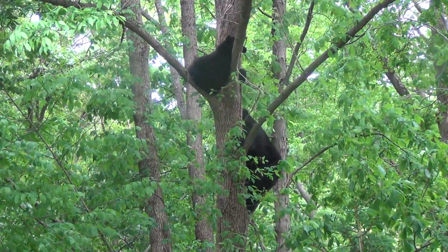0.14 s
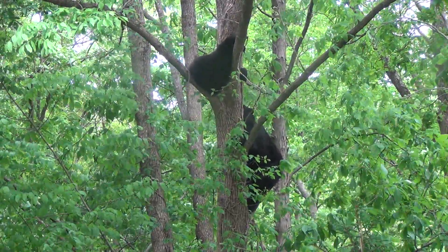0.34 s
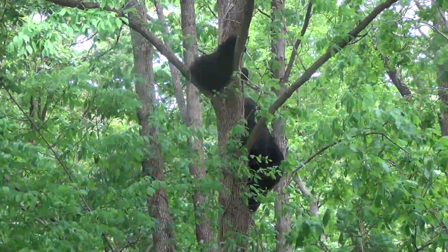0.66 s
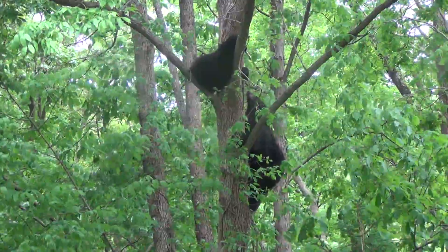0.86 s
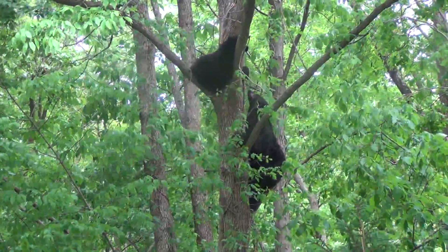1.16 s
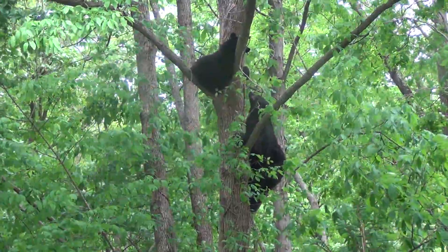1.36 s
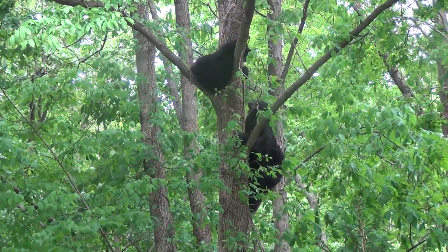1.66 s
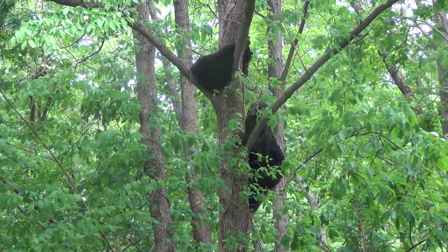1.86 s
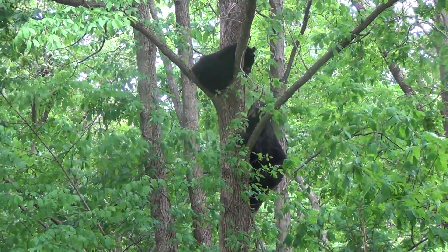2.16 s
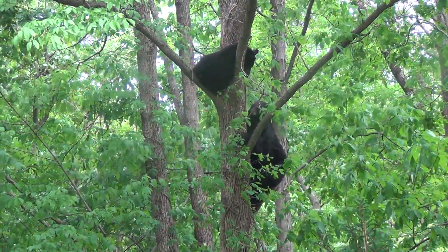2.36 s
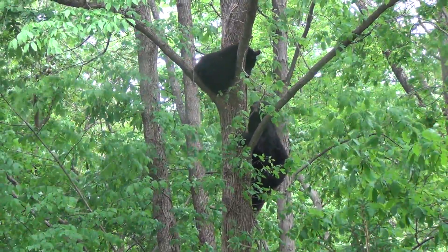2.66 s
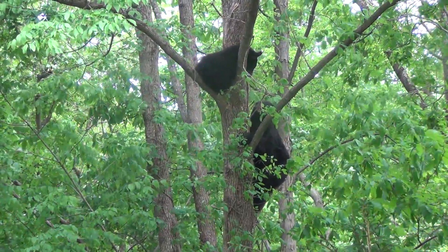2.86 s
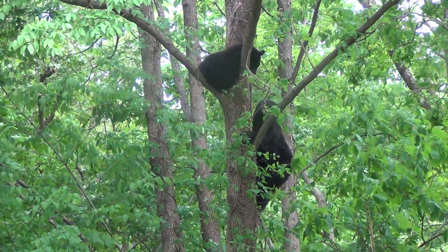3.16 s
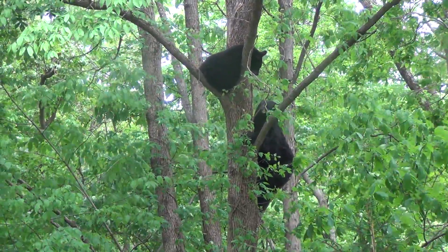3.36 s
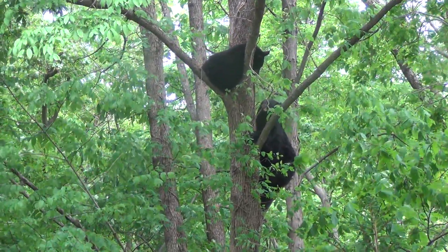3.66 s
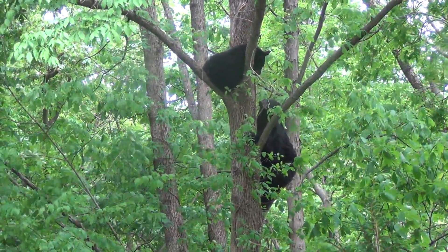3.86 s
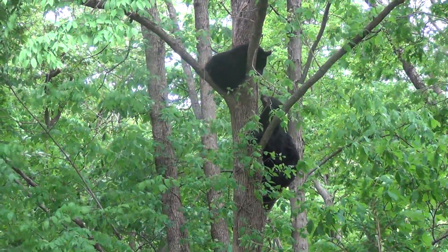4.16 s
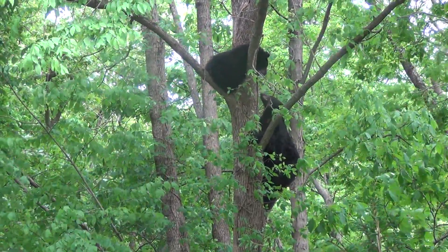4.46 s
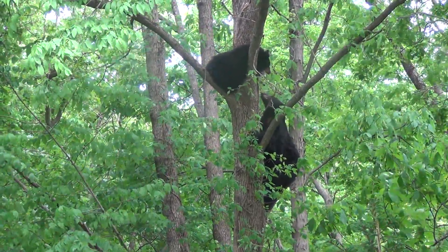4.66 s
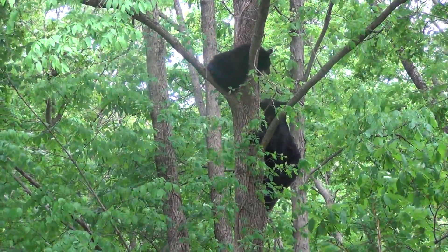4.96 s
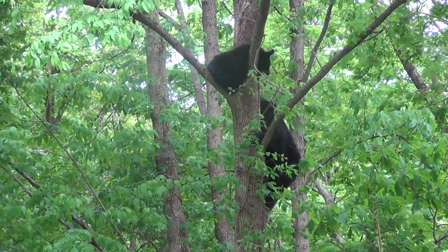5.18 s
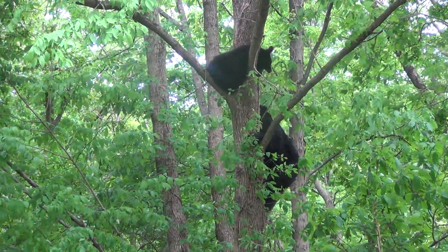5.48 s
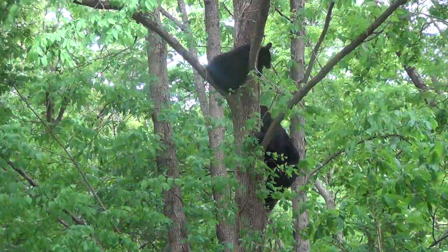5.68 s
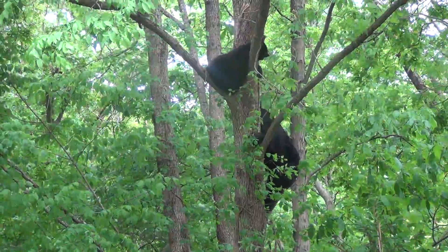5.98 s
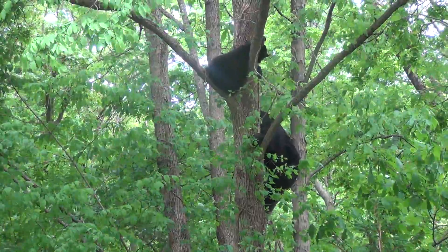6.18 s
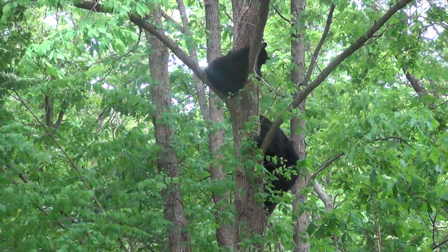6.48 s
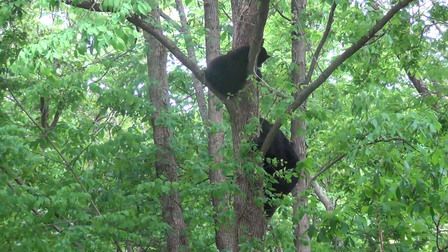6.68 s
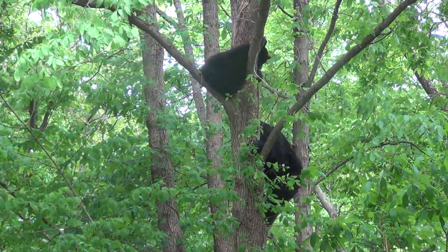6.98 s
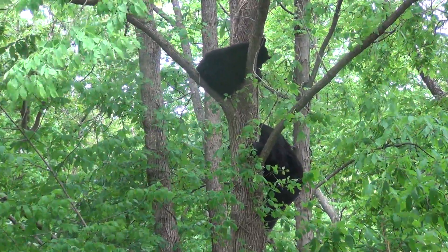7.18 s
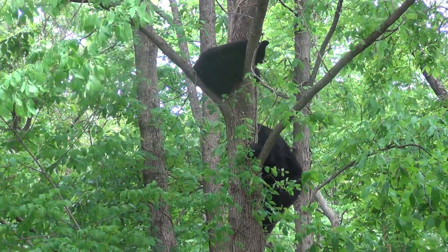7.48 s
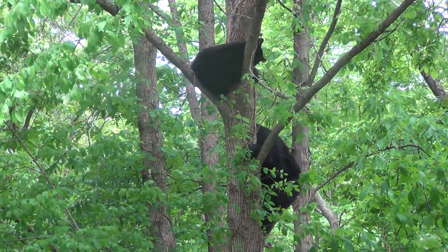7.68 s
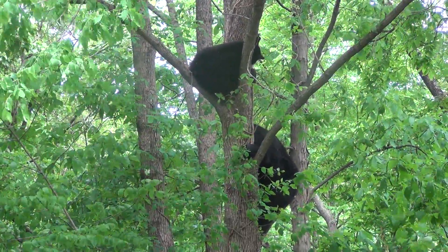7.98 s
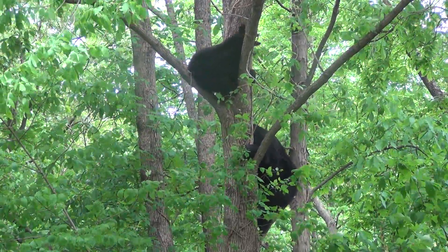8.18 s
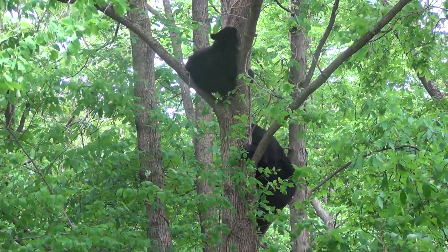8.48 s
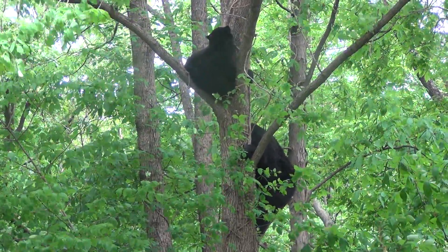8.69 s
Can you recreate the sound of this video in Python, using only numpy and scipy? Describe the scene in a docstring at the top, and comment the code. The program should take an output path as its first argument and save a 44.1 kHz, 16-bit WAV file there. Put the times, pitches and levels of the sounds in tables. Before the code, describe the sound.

A large dog barks repeatedly in echoing woods while treed bears scrape bark, pop jaws and huff, then one bawls into a hoarse, throbbing bellow.

```python
"""Dog and treed bears

A large dog barks up at two black bears in a tree: harsh pulses and breath through throat resonances, plus
a ringing octave and a second tone; the woods ring after each bark. The bears scrape the trunk (filtered
grain), pop their jaws and huff (noise bursts). A squeak sounds once; then one bear bawls and breaks into a
hoarse, pulsing bellow (vocal-fold pulses and breath). A gain control ducks under loud sounds."""
import sys
import numpy as np
from scipy import signal
from scipy.fft import rfft, irfft
from scipy.io import wavfile
from scipy.ndimage import uniform_filter1d, minimum_filter1d

SR = 44100
rng = np.random.default_rng(int(sys.argv[2]) if len(sys.argv) > 2 else 0)


def dump(signal):
    """Clip the signal to [-1, 1] and save it as 16-bit WAV at the path in sys.argv[1]."""
    limited = np.clip(np.atleast_2d(signal).T, -1, 1)
    pcm = np.round(limited * 32767).astype(np.int16)
    wavfile.write(sys.argv[1], SR, pcm)


N = 389844

# All level columns are relative, ahead of the mix.
# wash of the woods: [freq_hz, spectrum_db]
WASH_COLOUR = [(15, -37.5), (25, -17.5), (53, -7), (86, -4), (133, -2), (179, -6.5), (437, 3.5),
               (1120, -9.5), (1390, -7.5), (1590, -13), (2730, -16), (3130, -18), (3390, -16.5),
               (6140, -19), (15800, -26.5)]
WASH_DB = -50.5
# reverberation of the woods: [freq_hz, t60_s]
WOODS_DECAY = [(200, 0.62), (600, 0.61), (1200, 0.72), (3000, 0.52), (8000, 0.38)]

# claw strokes on the trunk: [start_s, level_db, rise_s, hold_s, fade_db_per_s, treble_db]
SCRAPES = [(0, -60.5, 0.015, 0.083, 79, 5), (0.404, -58.5, 0.014, .05, 42.5, 1),
           (0.53, -55.5, .02, .01, 81.5, 4), (1.049, -55.5, .035, .04, 40.5, 0.5),
           (1.134, -50.5, 0.063, 0.19, 126.5, -3), (1.5, -50.5, 0.034, .01, 54.5, -3.5),
           (4.091, -58, 0.04, 0.027, 63.5, -2), (5.53, -46, 0.025, 0.031, 66, 1),
           (5.996, -47, 0.042, 0.022, 105.5, -9.5), (6.205, -43.5, 0.03, 0.14, 41, 1),
           (6.36, -41.5, 0.025, 0.0088, 102, -0.5), (6.498, -48, .04, 0.19, 83, -3),
           (6.69, -50, 0.037, 0.14, 182.5, 5), (7.878, -50.5, 0.034, 0.046, 15, -2.5),
           (8.298, -53.5, 0.13, 0.076, 67.5, 2.5)]
# spectrum of the scrapes: [freq_hz, spectrum_db]
SCRAPE_COLOUR = [(60, -0.5), (150, 7.5), (400, 15), (1200, 6), (2000, 5.5), (3000, -2), (5000, -4),
                 (8200, -5.5), (10000, -22), (14000, -35.5)]
# dull bumps of a shifting body: [start_s, level_db, length_s]
BUMPS = [(1.112, -45, 0.28), (1.274, -36, 0.1525), (5.533, -66, 0.24)]

# barks: [start_s, effort_db, base_pitch_hz, roughness_0_to_1, second_tone_db]
BARKS = [(0.035, -18.5, 320.4, 0.51, -19.5), (0.392, -19.5, 298, 0.56, -3), (0.968, -19, 319.6, 0.45, -9.5),
         (1.315, -21, 283.7, 1, -5), (1.939, -19.5, 316.5, 0.51, -16.5),
         (2.794, -18.5, 313.7, 0.434, -12.5), (3.198, -19, 292.5, 0.55, -3),
         (3.874, -19, 318.8, 0.51, -9.5), (4.71, -18, 314, 0.47, -9.5), (5.173, -20, 302.2, 0.44, -6),
         (5.69, -17, 302.3, 0.46, -7.5), (7.843, -17.5, 322.4, 0.56, -2.5)]
# dog's throat resonances: [freq_hz, width_hz, level_db]
DOG_THROAT = [(284, 43, -12.5), (461, 189, 1), (605, 162, 0.5), (754, 56, -2), (1001, 118, -9.5),
              (1120, 350, -19.5), (1396, 270, -30.5), (1856, 284, -24.5), (4230, 500, -34),
              (5900, 590, -42.5), (7900, 2100, -46)]
# bark level: swell over the attack, hold, then a fade that steepens
BARK_ATTACK_S, BARK_SWELL_DB, BARK_HOLD_S, BARK_RELEASE_S, BARK_FADE_DB = 0.059, 20.5, 0.031, 0.15, 26
# bark pitch: starts high by a share, settles, sags by a share per s
BARK_YELP, BARK_SETTLE_S, BARK_SAG_PER_S = 0.08, 0.055, 0.37
# ringing peak of a bark: octave level ahead of the roughness scaling, time after the start, half length
RING_DB, RING_S, RING_HALF_S = 15, 0.094, 0.033

# hollow jaw pops: [start_s, level_db, pitch_hz]
POPS = [(1.272, -41.5, 1656), (1.325, -37, 1124), (1.834, -39.5, 1277), (4.731, -47, 1880),
        (5.673, -29, 1316)]
# sharp huffs: [start_s, level_db, t60_s, mouth_resonance_hz]
HUFFS = [(1.832, -41.5, 1, 1367), (1.873, -42, 0.9, 1515), (4.73, -35, 0.66, 1710),
         (5.512, -36.5, 1.25, 2180), (5.69, -49, 3, 2076), (6.04, -46, 2, 2080)]
# spectrum of the huffs' hiss: [freq_hz, spectrum_db]
HUFF_COLOUR = [(120, -33.5), (200, -18), (445, -3), (532, -10), (591, 7.5), (658, -22), (875, -24),
               (990, 3), (1540, -11), (2130, -4), (2540, -14.5), (2930, -6.5), (4250, -12.5), (8210, -15.5),
               (14000, -52)]
# squeak: top of the arch, half length, pitch range, level, flutter
SQUEAK_S, SQUEAK_HALF_S, SQUEAK_LOW_HZ, SQUEAK_TOP_HZ = 2.14, 0.07, 700, 1345
SQUEAK_DB, SQUEAK_FLUTTER_DB = -54.5, 5

# bear's calls, a short open bawl, then two that close to a hoarse bellow: [start_s, length_s, release_s,
# effort_db, bawl_pitch_hz, start_bend_hz, jaw_db, mouth_db, mouth_tuning_factor, opening_s, closes_after_s]
BEAR_CALLS = [(6.193, 0.4, 0.16, -11.5, 367.1, -30, 0.5, -2.5, 0.994, 0.068, 0.48),
              (6.646, 1.3, .14, -16.5, 361.5, -30, 1.5, -1.5, .96, 0.024, .26),
              (8.287, 0.64, .1, -15.5, 323.6, 45, 4, -11, .88, 0.012, .12)]
# bear's resonances with the jaw shut: [freq_hz, width_hz, level_db]
BEAR_CHEST = [(339.7, 168, 1), (510, 135, -5), (1737, 140, -34.5), (3130, 330, -51), (4800, 520, -38),
              (5860, 410, -39.5), (8400, 1400, -54.5)]
# bear's resonances with the jaw dropped: [freq_hz, width_hz, level_db]
BEAR_THROAT = [(600.7, 102, 3.5), (708, 78, -3.5), (862, 101, -11)]
# bear's resonances with the mouth wide open, ahead of tuning: [freq_hz, width_hz, level_db]
BEAR_MOUTH = [(992, 185, -5.5), (1112, 66, -1), (1250, 63, 2), (1446, 86, -11), (2123, 234, -11.5)]
# mouth closed to a bellow
BELLOW_HZ, BELLOW_JAW_DB, BELLOW_MOUTH_DB = 310.8, -5, -31.5
# roughness 0-1 of the first instant, the bawl, the bellow and the top of a strong throb
ROUGH_ONSET, ROUGH_BAWL, ROUGH_BELLOW, ROUGH_THROB = 0.8, 0.34, 0.68, 0.22
# throbs of effort: [top_s, surge_db, half_length_s, jaw_drop_before_db, recorder_thump_db]
THROBS = [(6.258, -1.5, 0.027, -2.5, -41), (6.402, -8.5, .03, -1, -47), (6.724, 3.5, .02, 1.5, -42.5),
          (6.778, 2, .025, -1.5, -56), (7.0, 7, .025, 4.5, -39), (7.24, 6, .024, 6.5, -38.5),
          (7.462, 8, .018, 3, -38), (7.515, 5.5, .018, -0.5, -37.5), (7.735, 10, .018, 8.5, -33.5),
          (8.381, 3.5, .025, -2, -36.5), (8.481, 3, .03, 6.5, -56), (8.619, 5.5, .035, -2.5, -36.5),
          (8.69, 4, .035, 7.5, -65)]
# a throb shifts the bellow's pitch and closes the jaw, which gapes just before
THROB_HZ, THROB_JAW_DB, GAPE_LEAD_S, GAPE_HALF_S = 349.3, -6.5, 0.039, 0.024
# calls: end ramps, release fade, tiring, mouth closing, pitch bend
CALL_RAMP_S, CALL_FADE_DB, CALL_TIRE_DB_PER_S, CLOSING_S, BEND_S = 0.035, 26, 1.6, 0.05, 0.075

EDGE_HZ = 15900  # upper band limit


def amp(db):
    """Decibels to gain."""
    return 10 ** (np.asarray(db) / 20)


def evened(x):
    """Scales to rms 1."""
    return x / np.sqrt(np.mean(x ** 2) + 1e-20)


def bell(t, half_s):
    """Smooth hump of height 1 around t = 0."""
    return np.exp(-(t / half_s) ** 2)


def blend(a, b, share):
    """Goes from a to b as share goes from 0 to 1."""
    return a + (b - a) * share


def read(points, hz):
    """Joins (Hz, value) points on a log-frequency axis."""
    f, value = np.transpose(points)
    return np.interp(np.log(hz + 1), np.log(f + 1), value)


def add(mix, s, sound):
    """Mixes a sound in at time s."""
    part = mix[max(round(s * SR), 0):][:len(sound)]
    part += sound[:len(part)]


def coloured(x, curve):
    """Filters N samples by a (Hz, dB) curve, zero phase."""
    gain = amp(read(curve, np.fft.rfftfreq(N, 1 / SR)))
    return irfft(rfft(x) * gain, N)


def noise(colour):
    """Noise of a given spectrum, rms 1."""
    return evened(coloured(rng.standard_normal(N), colour))


def wander(size, hz):
    """Smooth random curve with about hz new values a second."""
    return np.interp(np.arange(size) * hz / SR, np.arange(4000), rng.standard_normal(4000))


def throat(x, modes, low_hz):
    """Causal minimum-phase filter: steep resonances, little below low_hz, output rms 1."""
    f = np.fft.rfftfreq(8192, 1 / SR)
    power = sum(amp(db) ** 2 / (1 + ((f - hz) / width) ** 2 * 2) ** 3 for hz, width, db in modes)
    gain = np.sqrt(power / (1 + (low_hz / (f + 1)) ** 8)) + 1e-5
    log_gain = np.log(np.r_[gain, gain[-2:0:-1]])
    taps = np.fft.ifft(np.exp(np.conj(signal.hilbert(log_gain)))).real[:2048]
    return evened(signal.fftconvolve(x, taps)[:len(x)])


def folds(hz, rough, jitter, jitter_hz, top_hz, limp=0):
    """Jittered vocal-fold pulses, alternating in strength if they limp, and a puff of air in every cycle."""
    turns = np.cumsum(hz * (1 + jitter * rough * wander(len(hz), jitter_hz))) / SR
    pulses = sum(np.cos(2 * np.pi * k * turns) / (1 + (k * hz / top_hz) ** 4) for k in range(1, 13))
    alternation = limp * (1 + 0.5 * wander(len(hz), 25)) * np.cos(np.pi * turns)
    pulses = pulses * (1 + alternation)
    puffs = evened((0.55 + np.exp(-(turns % 1) / 0.27)) * rng.standard_normal(len(hz)))
    rough = np.clip(rough, 0, 1)
    return (1 - rough) * pulses * np.sqrt(4 * hz / SR) + rough * puffs


def place(x, left_db):
    """Sets a sound left_db louder on the left than on the right."""
    return x * amp([[left_db / 2], [-left_db / 2]])


def air():
    """Soft wash of the woods: slowly wavering noise, unlike on the two sides mostly in the bass."""
    side_colour = [(20, 0), (60, -4), (150, -11), (500, -16), (3000, -20), (15000, -30)]
    side = coloured(noise(WASH_COLOUR), side_colour)
    wash = noise(WASH_COLOUR) + side * np.array([[1], [-1]])
    return amp(WASH_DB) * wash * amp(1.0 * wander(N, 5.7))


def claws(grains_per_s=450, grain_share=0.63):
    """Tree bark rasps and crackles under claws, each stroke rising, holding and fading; dull bumps."""
    t, power, treble_power, weight = np.arange(N) / SR, np.zeros(N), np.zeros(N), np.zeros(N)
    for s, db, rise, hold, fade_db_per_s, treble_db in SCRAPES:
        fade_db = fade_db_per_s * np.clip(t - s - rise - hold, 0, 2)
        force = np.clip((t - s) / rise, 0, 1) * amp(db - fade_db)
        power += force ** 2
        treble_power += (force * amp(treble_db)) ** 2
    for s, db, length in BUMPS:
        add(weight, s, amp(db) * np.hanning(int(length * SR)))

    flakes = (rng.random(N) < grains_per_s / SR) * rng.standard_normal(N)
    crackle = rng.standard_normal(200) * np.exp(-np.arange(200) / 45)
    flakes = evened(coloured(signal.fftconvolve(flakes, crackle)[:N], SCRAPE_COLOUR))
    grain = evened(noise(SCRAPE_COLOUR) + grain_share * flakes)
    high_pass = signal.butter(2, 4500, "highpass", fs=SR, output="sos")
    treble = signal.sosfiltfilt(high_pass, grain)
    rasp = amp(10.5) * (np.sqrt(power) * (grain - treble) + np.sqrt(treble_power) * treble)
    thud = noise([(25, -9.0), (70, -7.5), (140, -12), (240, 1), (600, -30), (3000, -73.5)])
    return rasp + weight * thud


def dog(second_hz=436):
    """Barks start harsh, clear toward a ringing octave and sag; a second tone sounds below the octave."""
    out, t = np.zeros(N), np.arange(SR // 4) / SR
    rising = np.maximum(1 - t / BARK_ATTACK_S, 0)
    falling = np.maximum(t - BARK_ATTACK_S - BARK_HOLD_S, 0) / BARK_RELEASE_S
    swell = amp(-BARK_SWELL_DB * rising - BARK_FADE_DB * falling ** 2) * np.minimum(t / 0.0092, 1)
    glide = 1 + BARK_YELP * bell(t, BARK_SETTLE_S) - BARK_SAG_PER_S * (t - RING_S)
    peak = bell(t - RING_S, RING_HALF_S)
    for s, db, hz, rough, second_db in BARKS:
        harsh = np.clip(rough + 0.37 * bell(t, 0.04133), 0, 1)
        pitch = hz * glide * (1 + 0.004 * wander(len(t), 40))
        drive = folds(pitch, harsh, jitter=0.05, jitter_hz=200.2, top_hz=1690)
        voice = throat(drive, DOG_THROAT, low_hz=245)
        # the clearer the bark, the stronger the octave
        ring = amp(RING_DB) * (1 - harsh) ** 2 * (0.25 + peak)
        octave = ring * np.sin(4 * np.pi * np.cumsum(pitch) / SR)
        second_pitch = second_hz * np.sqrt(glide) * (1 + 0.031 * rough * wander(len(t), 120))
        second = np.sin(2 * np.pi * np.cumsum(second_pitch) / SR) * (1 + 0.14 * wander(len(t), 90))
        second = amp(second_db + 6.0) * (0.25 + 1.25 * peak) * second
        bark = swell * (voice * (1 - 0.26 * peak) + octave + second)
        add(out, s, amp(db - 1) * evened(bark))
    return out


def woods(x, wet_db, build_s=0.02):
    """Trunks and leaves scatter a sound into a tail of sparse echoes; each band dies at its own speed."""
    taps = np.zeros(SR)
    at = np.arange(200, SR - 20, 20)
    taps[at + rng.integers(0, 20, len(at))] = rng.choice([-1., 1.], len(at))
    hz, t, z = signal.stft(taps, SR, nperseg=256)
    decay = amp(-60 * t / read(WOODS_DECAY, hz)[:, None]) * (1 - np.exp(-t / build_s))
    tail = signal.istft(z * decay, SR, nperseg=256)[1]
    wet = evened(signal.fftconvolve(x, tail)[:N])
    return x + amp(wet_db) * wet * np.sqrt(np.mean(x ** 2))


def pops(t60_s=0.16):
    """The mouth rings briefly as the jaws clap shut: decaying noise through two resonances."""
    out, t = np.zeros(N), np.arange(SR // 6) / SR
    for s, db, hz in POPS:
        clap = rng.standard_normal(len(t)) * amp(-60 * t / t60_s)
        add(out, s, amp(db - 5.5) * throat(clap, [(hz, 300, 0), (1.625 * hz, 900, -13)], low_hz=500))
    return out


def huffs(mouth_share=0.78):
    """Air blown hard through the lips: hiss and mouth noise, a sudden start and a fluttering decay."""
    out, t, hiss = np.zeros(N), np.arange(SR // 2) / SR, noise(HUFF_COLOUR)
    for s, db, t60_s, hz in HUFFS:
        mouth = throat(rng.standard_normal(len(t)), [(hz, 700, 0)], low_hz=500)
        blow = 0.87 * hiss[round(s * SR):][:len(t)] + mouth_share * mouth
        add(out, s, amp(db - 60 * t / t60_s) * (1 - np.exp(-t / 0.0027)) * blow)
    return out * amp(1.9 * wander(N, 90))


def squeak():
    """A faint, fluttering squeak arching up and down: partials 5 to 10, strongest near 8 kHz."""
    out, t = np.zeros(N), np.arange(-SQUEAK_HALF_S, 2 * SQUEAK_HALF_S, 1 / SR)
    arch = bell(t, SQUEAK_HALF_S)
    pitch = blend(SQUEAK_LOW_HZ, SQUEAK_TOP_HZ, arch) * (1 + 0.008 * wander(len(t), 400))
    turns = np.cumsum(pitch) / SR
    partials = np.zeros(len(t))
    for k in range(5, 11):
        partial_db = SQUEAK_FLUTTER_DB * wander(len(t), 120) - abs(k * pitch - 8000) / 400
        partials += np.sin(2 * np.pi * k * turns) * amp(partial_db)
    add(out, SQUEAK_S + t[0], amp(SQUEAK_DB) * np.sqrt(arch * np.hanning(len(t))) * evened(partials))
    return out


def throbbing(t):
    """Throbs of effort at times t: depth 0-1, surge dB, drop of the jaw dB."""
    throb = sum(bell(t - s, half) for s, _, half, _, _ in THROBS)
    surge_db = sum(db * bell(t - s, half) for s, db, half, _, _ in THROBS)
    gape_db = sum(db * bell(t - s + GAPE_LEAD_S, GAPE_HALF_S) for s, _, _, db, _ in THROBS)
    return np.minimum(throb, 1), surge_db, gape_db


def bellow(snarl_db=-32, snarl_s=0.046, onset_s=0.06):
    """A short open bawl, then two that close to a low, hoarse bellow, which clears at strong throbs."""
    out = np.zeros(N)
    for (s, length, release, effort_db, bawl_hz, bend_hz, bawl_jaw_db, bawl_mouth_db,
         tuning, opening, closes) in BEAR_CALLS:
        t = np.arange(round(length * SR)) / SR
        throb, surge_db, gape_db = throbbing(s + t)
        bawl = (1 - np.tanh((t - closes) / CLOSING_S / 2)) / 2
        wide = bawl * np.minimum(t / opening, 1)

        release_db = CALL_FADE_DB * np.maximum(1 - (length - t) / release, 0)
        db = effort_db + surge_db - CALL_TIRE_DB_PER_S * t - release_db
        jaw_db = blend(BELLOW_JAW_DB, bawl_jaw_db, wide) + gape_db + THROB_JAW_DB * throb * (1 - bawl)
        mouth_db = blend(BELLOW_MOUTH_DB, bawl_mouth_db, wide) + gape_db / 2 - surge_db

        hz = blend(blend(BELLOW_HZ, THROB_HZ, throb), bawl_hz, bawl) + bend_hz * bell(t, BEND_S)
        rough = blend(ROUGH_BELLOW, ROUGH_BAWL, bawl)
        rough = blend(rough, ROUGH_THROB, throb * np.clip(surge_db / 5, 0, 1))
        rough = blend(rough, ROUGH_ONSET, bell(t, onset_s))
        waver = 1 + 0.018 * wander(len(t), 45)
        drive = folds(hz * waver, rough, jitter=0.06, jitter_hz=159.0, top_hz=1800, limp=0.16)

        mouth = [(tuning * f, width, level) for f, width, level in BEAR_MOUTH]
        voice = throat(drive, BEAR_CHEST, low_hz=270)
        voice = voice + amp(jaw_db) * throat(drive, BEAR_THROAT, low_hz=423)
        voice = voice + amp(mouth_db) * throat(drive, mouth, low_hz=600)
        # the lips are drawn back as each call starts
        snarl = amp(snarl_db) * bell(t - snarl_s, 0.02) * throat(drive, [(2097, 190, 0)], low_hz=900)
        fade = np.clip(np.minimum(t, length - t) / CALL_RAMP_S, 0, 1) ** 2
        add(out, s, fade * (amp(db) * voice + snarl))
    return out


def recorder_thumps(width_s=0.0011, tick_db=-4):
    """A dull low thump with a faint tick as the recorder's gain jumps at each throb."""
    out, t = np.zeros(N), np.arange(-SR // 30, SR // 30) / SR
    for s, _, _, _, db in THROBS:
        swing = (t / width_s) * np.exp(0.5 - abs(t / width_s))
        tick = throat(rng.standard_normal(len(t)), [(1300, 2200, 0.0021)], low_hz=200) * bell(t, 0.005)
        add(out, s + t[0], amp(db) * (2 * swing + amp(tick_db) * tick))
    return out


def widen(x, side_db=-8):
    """Left and right differ in the bass and around 5 to 8 kHz, little between."""
    f = np.fft.rfftfreq(N, 1 / SR)
    side_colour = [(100, 0.5), (1000, -30), (3000, -32.5), (5500, -2.5), (7500, 3.0), (11000, -13.5)]
    share = amp(side_db + read(side_colour, f))
    scatter = rng.standard_normal(900) * np.exp(-np.arange(900) / 300)
    side = irfft(share * rfft(scatter / np.linalg.norm(scatter), N) * rfft(x.mean(0)), N)
    return x + side * np.array([[1], [-1]])


def scene():
    """The dog a little to the left, the bellow a little to the right."""
    barking = woods(dog(), wet_db=-6)
    bawling = woods(amp(-0.5) * bellow(), wet_db=-4.5) + recorder_thumps()
    rustle = woods(huffs() + pops() + claws(), wet_db=-1.5)
    voices = place(barking, left_db=3.4) + place(bawling, left_db=-1.9)
    return widen(voices + place(rustle, left_db=-1.5) + squeak() + air())


def record(dry, whine_db=-78, low_cut_hz=45):
    """Low cut, fast-falling and slowly recovering gain, faint electronic whine, peak limiter, band limit."""
    t, limit_db, recover_db_per_s, ceiling_db = np.arange(N) / SR, -11, 12, -3.5
    dry = signal.sosfilt(signal.butter(1, low_cut_hz, "highpass", fs=SR, output="sos"), dry)
    whine = amp(whine_db) * np.sin(2 * np.pi * 15734 * t)

    power_db = 10 * np.log10(abs(uniform_filter1d((dry ** 2).mean(0), size=500)) + 1e-12)
    recovery_db = recover_db_per_s * t
    held_db = np.maximum.accumulate(power_db + recovery_db) - recovery_db
    over_db = np.maximum(held_db - limit_db, 0)
    ducked = dry / amp(0.85 * uniform_filter1d(over_db, size=200)) + whine

    peaks = -minimum_filter1d(-abs(ducked).max(0), size=130)
    limiter = np.minimum(amp(ceiling_db) / (peaks + 1e-9), 1)
    limited = ducked * uniform_filter1d(limiter, size=130)
    band_limit = signal.firwin(511, EDGE_HZ, window=("kaiser", 9), fs=SR)
    return signal.oaconvolve(limited, band_limit[None], "same")


dry = scene()
out = record(dry)
dump(out)
```